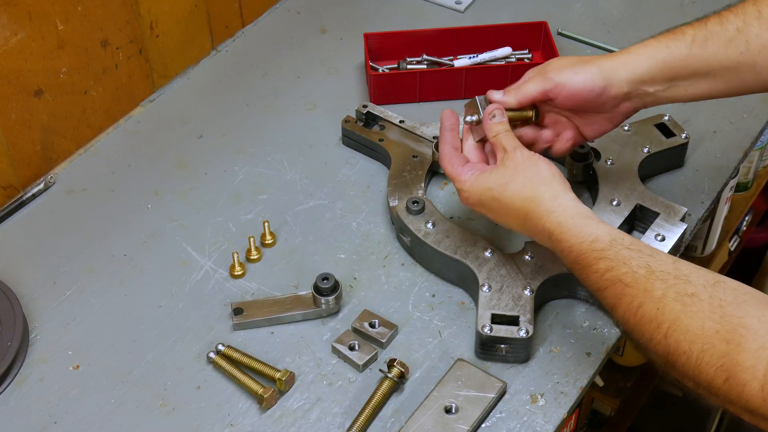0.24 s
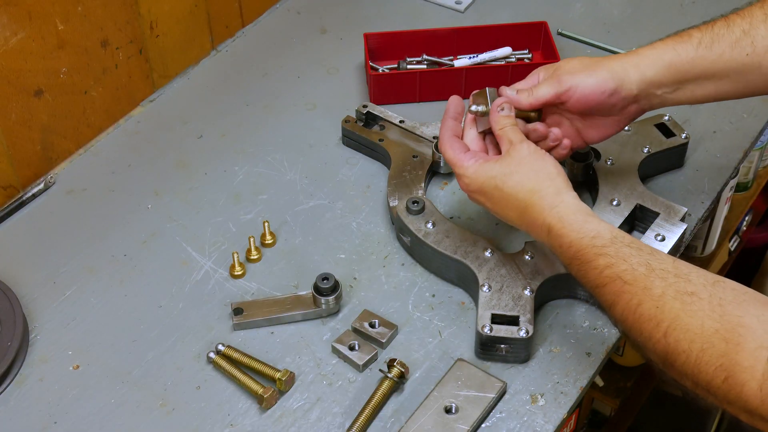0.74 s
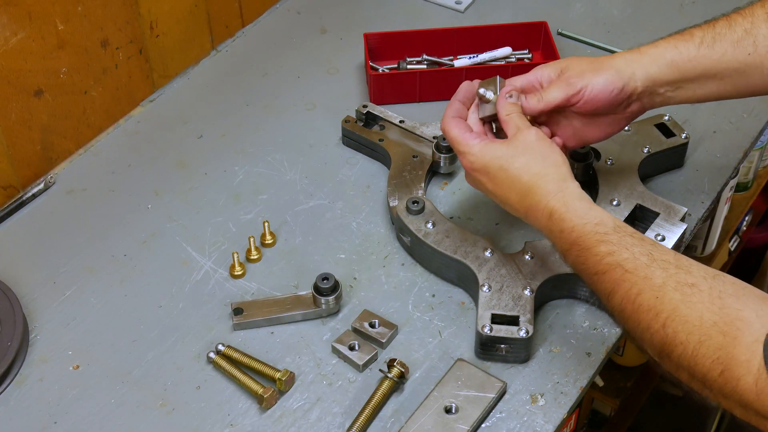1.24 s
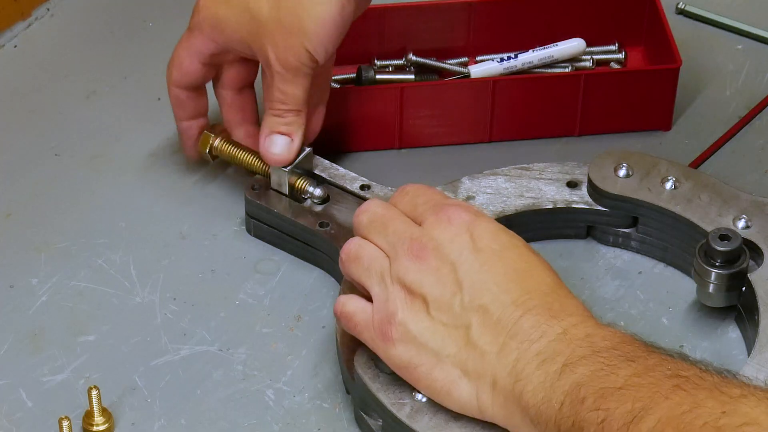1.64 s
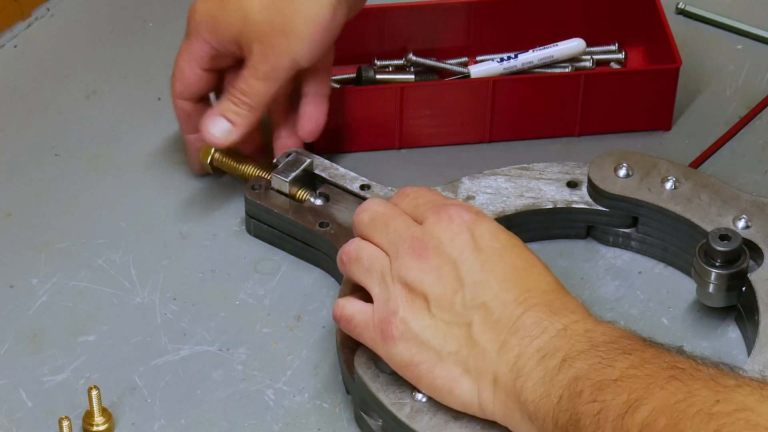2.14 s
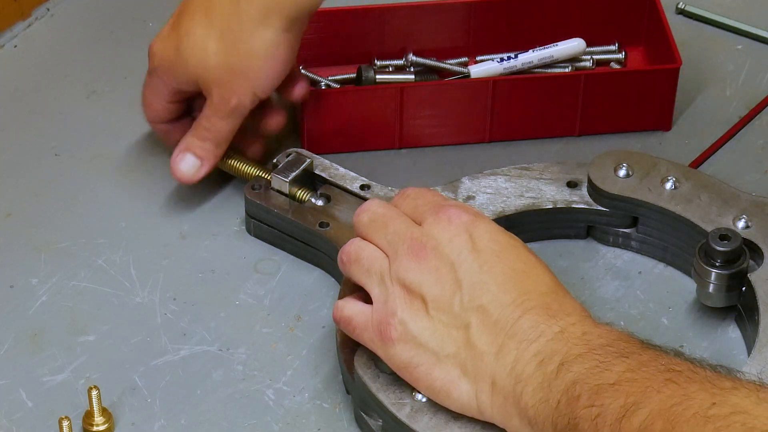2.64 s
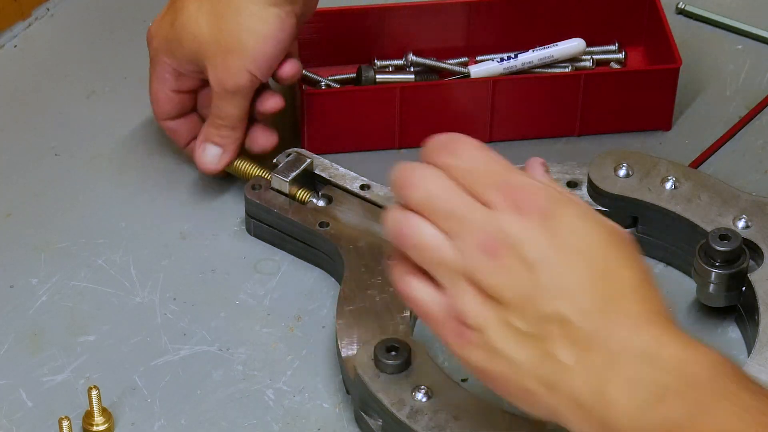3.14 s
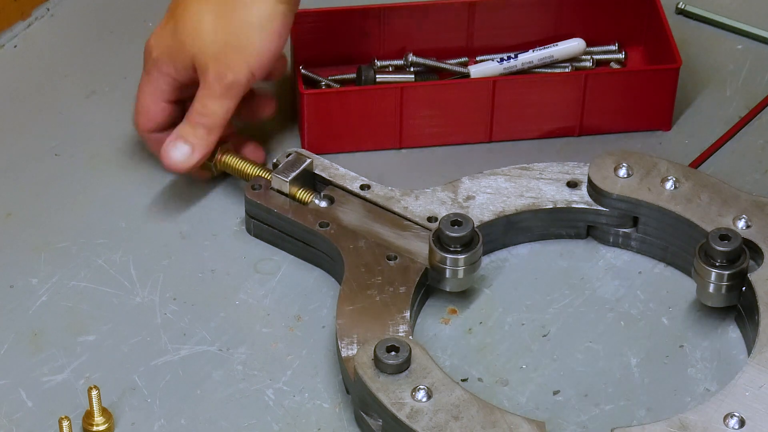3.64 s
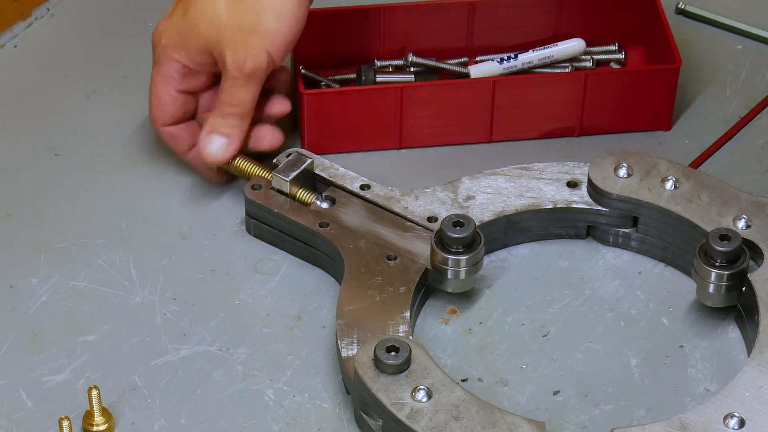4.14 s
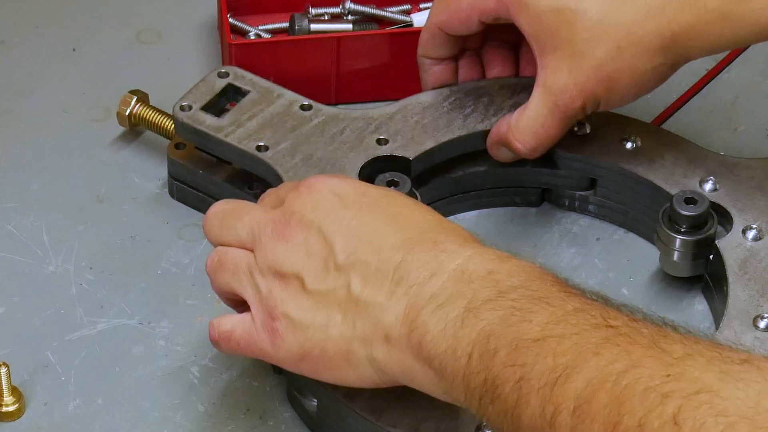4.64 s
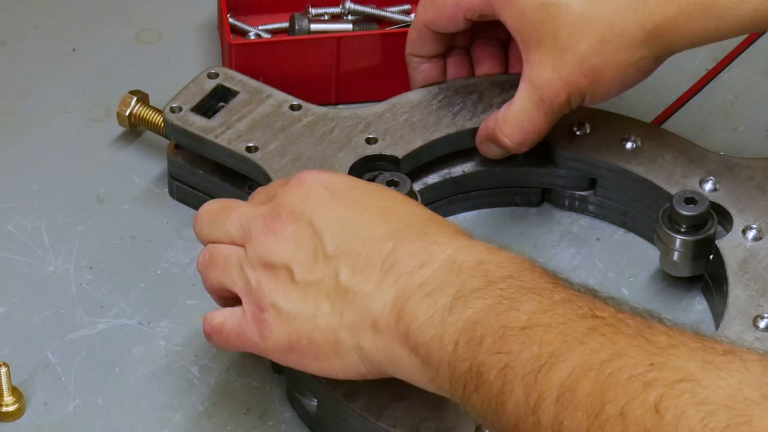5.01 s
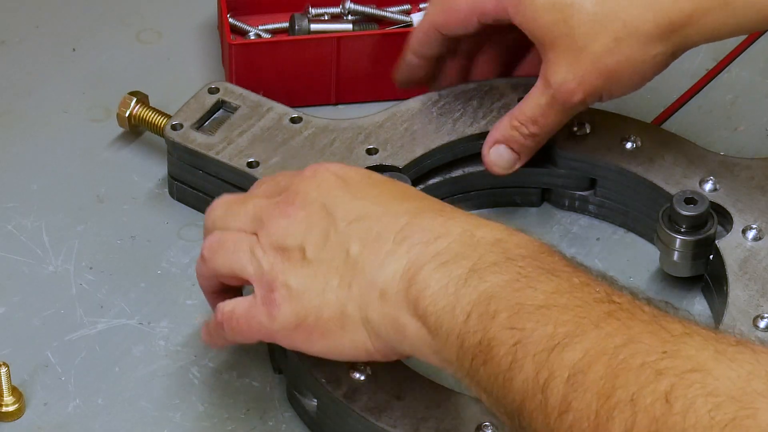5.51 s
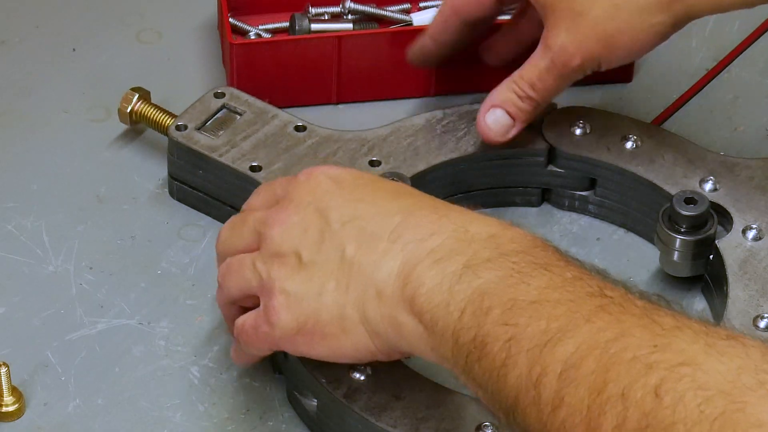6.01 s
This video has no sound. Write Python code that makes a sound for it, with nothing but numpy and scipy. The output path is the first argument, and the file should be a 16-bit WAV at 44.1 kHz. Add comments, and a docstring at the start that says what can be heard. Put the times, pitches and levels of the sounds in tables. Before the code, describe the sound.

A fan rushes steadily in a small workshop while a bolt turns into a steel nut with faint pings. The background noise jumps up, and the pair drops into a steel frame with a sharp clink, followed by light knocks and finger rubbing. The noise falls back, then a steel plate clinks and clatters into its seat, thudding softly through the workbench. The microphone is close and nearly mono.

```python
"""Faint pings over a steady fan: a bolt is turned into a steel nut, close to a nearly mono microphone.
Both drop into the slot of a steel frame and knock as fingers screw them on. A cover plate then clinks
into its seat. Each blow is a chatter of impacts that drives clear ringing modes and a damped clack,
thuds through the workbench and echoes in a small workshop. Midway the background noise steps up
abruptly for three seconds, then drops back."""
import sys
import numpy as np
from scipy import signal
from scipy.fft import rfft, irfft, next_fast_len
from scipy.io import wavfile
from scipy.ndimage import uniform_filter1d

SR = 44100
rng = np.random.default_rng(int(sys.argv[2]) if len(sys.argv) > 2 else 0)


def transcribe(u):
    """Save the signal u as a 16-bit wav file named by the first command-line argument.

    u: samples, shape (n,) or (channels, n), limited to [-1, 1]; the rate is SR.
    q: integer samples, one column per channel.
    """
    v = np.clip(np.atleast_2d(u).T, -1, 1)
    q = np.round(v * 32767).astype(np.int16)
    wavfile.write(sys.argv[1], SR, q)


N = 276507
BLOW_TIME_S = np.arange(SR // 2) / SR
NUT_ECHO_DB, SHIMMER_ECHO_DB = -6, -3  # hand and slot shade these from the walls

# Plate on frame. Each row: start in seconds, strength in dB, shimmer over strength in dB, thud in dB,
# chatter in seconds, hardness in Hz, favoured plate mode in Hz, favoured shimmer mode in Hz.
PLATE_KNOCKS = [ (4.634, -49.5, -15, -48.5, 0.0026, 5060, 3270, 9400),
                (4.642, -61, -14.5, -51.5, 0.0014, 4430, 5690, 12310),
                (4.933, -44.5, -31, -42, 0.0023, 3930, 3470, 12740),
                (4.937, -59, -10, -55, 0.0023, 4470, 4478, 9840),
                (5.036, -61, -20, -48.5, 0.0041, 3020, 3270, 9873),
                (5.231, -48.5, -17, -45, 0.0024, 4490, 4478, 8130),
                (5.262, -61, -17, -47.5, 0.0057, 3000, 2660, 12740),
                (5.37, -49, -14, -37.5, .007, 3800, 3470, 8130),
                (5.384, -45, -21, -42, 0.0034, 1500, 2660, 7090),
                (5.388, -41, -5, -41, 0.0057, 6000, 5217, 7090),
                (5.4058, -31.5, -12, -35, 0.0027, 11000, 4600, 7090),
                (5.4071, -35, -6, -32.5, 0.003, 11100, 5070, 12310),
                (5.414, -28, -15, -44, 0.005, 11000, 4955, 11580),
                (5.43, -36, -14, -43, 0.0026, 7400, 4570, 9400),
                (5.445, -44, -18, -46.5, 0.0028, 7900, 5217, 11580),
                (5.8321, -56, -8, -41, 0.0076, 7000, 5217, 11580),
                (5.8604, -31, -11, -34.5, 0.0069, 5100, 3270, 9400),
                (5.873, -33.5, -27, -34, 0.0098, 3800, 4430, 9873),
                (5.948, -33, -6, -47, 0.0028, 6700, 4515, 8050),
                (5.958, -59, -19, -42.5, 0.0044, 2000, 4478, 8130),
                (5.9824, -29.5, -3.5, -39, 0.0022, 8300, 3470, 8130)]
# Bolt and nut in the slot. Each row: start in seconds, ring in dB, nut over bolt in dB, clack over ring
# in dB, glint in dB, chatter in seconds, hardness in Hz, favoured mode in Hz, favoured glint in Hz.
BOLT_KNOCKS = [ (1.759, -44, 10, -1, -77, .005, 5000, 5870, 11380),
               (1.778, -21.5, 25, 1.5, -49, 0.0008, 11100, 5770, 14880),
               (1.78, -22.5, 27, -3.5, -43, .001, 14000, 5770, 11380),
               (1.787, -45, 6, 9, -52, 0.0023, 14000, 5240, 11380),
               (2.539, -48, -3, 3.5, -65, 0.019, 7000, 5740, 11380),
               (2.875, -52.5, -10, -4, -76, 0.016, 6000, 5240, 14880),
               (3.221, -35, 24, -3.5, -71, 0.0015, 4500, 5750, 14880),
               (3.272, -42.5, -18, -1, -72, 0.0021, 6000, 3060, 11380),
               (3.357, -57, -9, 3, -88, .0012, 14000, 5240, 11380),
               (3.6072, -37.5, -33, -5, -77, 0.0021, 12200, 3070, 14880),
               (3.677, -57, -13, 8.5, -85, .0034, 10000, 5240, 11380),
               (3.817, -43.5, -8, -6, -84, 0.006, 5000, 5240, 11380),
               (3.866, -44.5, -7, 2.5, -65, 0.0084, 11000, 5770, 11380),
               (3.925, -47.5, -24, 1.5, -83, 0.003, 7000, 5240, 11380),
               (4.129, -41.5, 3, -8, -78, 0.0026, 6000, 5940, 11380),
               (4.148, -45.5, -3, 0.5, -67, 0.014, 4500, 5240, 11380),
               (4.212, -46.5, 11, 6, -73, .0077, 6000, 5700, 11380),
               (4.242, -38.5, 12, -4, -81, 0.011, 3500, 5600, 14880),
               (4.339, -57, -7, -1, -85, .0012, 14000, 5240, 11380),
               (4.477, -43, -10, -3, -76, 0.0048, 5070, 5240, 11380),
               (4.493, -49, -11, -3, -82, 0.0037, 4930, 4750, 14880)]
# Nut on thread. Each row: start in seconds, level in dB, scrape time in seconds.
THREAD_TWISTS = [(.125, -67, .043), (.455, -65, 0.05), (0.773, -63, 0.015), (1.035, -63, .054),
                 (1.27, -63, 0.0089)]
# Fingers on thread and frame. Each row: centre in seconds, length in seconds, peak level in dB.
FINGER_RUBS = [(2.897, 0.22, -45.5), (3.548, 0.16, -42.5), (3.862, 0.1, -41), (4.197, 0.16, -41.5),
               (5.826, 0.072, -49.5)]
# Hand on the work. Each row: start in seconds, level in dB, contact time in seconds.
HAND_BUMPS = [(3.253, -35.5, 0.0097), (5.246, -41.5, 0.0048)]

# Clear modes of each part. Each row: frequency in Hz, relative level in dB, T60 in seconds.
PLATE_MODES = [(2660, -9, .08), (2915, -10, .08), (3270, -2.5, .1), (3470, -4, .04), (4064, -9, .09),
               (4478, -3, .17), (4548, -5.5, .15), (4592, -10, .1), (4790, -11, .07), (4955, -6, .12),
               (5070, -8, .11), (5217, -6, .12), (5450, -10, .1), (5690, -7, .11), (5980, -12, .09),
               (6367, -8, .13)]
SHIMMER_MODES = [(7090, -6, .16), (8005, -10, .18), (8120, -1, .035), (8155, -10, .2), (8600, -6, .025),
                 (9400, -5, .06), (9873, -4, .12), (10640, -11, .09), (11580, -2, .07), (12310, -7, .2),
                 (12740, -6, .16), (14270, -6, .15), (15280, -10, .17)]
NUT_MODES = [(5670, -5, .03), (5770, 0, .036), (5870, -5, .034), (6440, -17, .025), (8260, -24, .05)]
BOLT_MODES = [(3000, -2, .035), (4150, -9, .012), (4750, -7, .01), (5240, -4, .018), (9700, -27, .008)]
GLINT_MODES = [(11340, -2, .11), (11420, 0, .13), (14880, 0, .05)]
FRAME_MODES = [(400, 0, .1), (555, -9, .09), (805, -3, .08), (940, -3, .1), (1085, 0, .12), (1285, -1, .15),
               (1550, -5, .12), (2084, -12, .12), (2400, -11, .1)]
BENCH_MODES = [(74, -6, .12), (100, -1, .14), (135, 0, .11)]

# Spectra of the damped bodies, skin friction and fan rush. Each row: frequency in Hz, relative gain in dB.
PLATE_SPECTRUM = [(100, -22), (600, -6), (1800, -9), (3000, -2), (4800, -2), (5900, -0.5), (7400, -13),
                  (9500, -14), (12500, -22), (13500, -14), (15500, -58)]
FRAME_SPECTRUM = [(100, -30), (500, -13), (850, 3.5), (1100, 5), (1700, -1.5), (3000, -5), (5200, -4.5),
                  (6300, -3.5), (7300, -19), (10000, -20.5), (15500, -22.5)]
BENCH_SPECTRUM = [(30, -42.5), (70, -23), (105, -13), (160, 1), (300, -0.5), (420, -1), (560, -5.5),
                  (900, -9), (1300, -12.5), (2200, -35), (6000, -61)]
FINGER_SPECTRUM = [(40, -20.5), (130, 5), (250, 5), (500, -0.5), (900, -14), (1700, -4), (3000, -14.5),
                   (6000, -20.5), (15000, -86)]
FAN_SPECTRUM = [(15, -36.5), (25, -1), (119, -15.5), (178, -7), (209, -11), (274, -7), (445, -6), (552, -3),
                (703, -5.5), (871, -3.5), (1300, -3.5), (3720, -15.5), (8810, -38.5), (11200, -40),
                (15500, -53)]

# Workshop echo. Each row: frequency in Hz, band gain in dB, T60 in seconds.
ROOM_BANDS = [(152, -11, .25), (491, -18, 0.9), (1311, -3, 0.18), (2890, -7.5, 0.28), (6000, -12, 0.3),
              (8500, -5.5, 0.2), (13940, -4.5, .15)]
# Fan resonances. Each row: frequency in Hz, width in Hz, base level in dB.
FAN_PEAKS = [(60, 3.06, -79.5), (95.4, 1.1, -74.5), (276.8, 13.24, -69), (563.5, 10, -69),
             (1063, 40.3, -100), (1346, 28, -72.5)]
# Share of the rush that differs between left and right. Each row: frequency in Hz, gain in dB.
FAN_SIDE_SPECTRUM = [(40, -30), (150, -27.5), (1000, -42), (3000, -25.5), (5500, -17), (9000, -10.5),
                     (15000, -8)]


def cover_plate(choke_db_per_db=0.15, full_jolt_hz=8430, jolt_db_per_octave=17.5):
    """The plate clinks, shimmers, rocks the bench and jolts the nut. Returns direct sound, room feed."""
    body, shimmer, nut = np.zeros((3, N))
    for start_s, db, shimmer_db, thud_db, chatter_s, hardness_hz, favoured_hz, shimmer_hz in PLATE_KNOCKS:
        # only hard blows jolt the nut fully
        nut_db = db + 1.5 + jolt_db_per_octave * min(np.log2(hardness_hz / full_jolt_hz), 0)
        # strong blows press the plate down and choke its ring
        ring_db = db - 1.5 - choke_db_per_db * (db + 45)
        force = contact(chatter_s)
        push = soften(force, hardness_hz)
        landing = settling(force, lag_s=0.011, db=-11.5)
        thud = bench_thud(landing, thud_db)
        boom = ring(soften(landing, hardness_hz=250), BENCH_MODES, thud_db - 12)
        clack = damped_burst(landing, PLATE_SPECTRUM, db - 1.5, hardness_hz, t60_s=0.04)
        clink = ring(push, struck_at(PLATE_MODES, favoured_hz), ring_db)
        add(body, start_s, thud + boom + clack + clink)
        shimmer_modes = dulled(struck_at(SHIMMER_MODES, shimmer_hz), hardness_hz)
        add(shimmer, start_s, ring(push, shimmer_modes, db + shimmer_db, pressed_gain=0.65))
        cushioned_modes = dulled(NUT_MODES, hardness_hz=4000)  # the frame cushions the jolt
        add(nut, start_s, ring(push, cushioned_modes, nut_db))
    room_feed = body + undb(SHIMMER_ECHO_DB) * shimmer + undb(NUT_ECHO_DB) * nut
    return np.array([body + shimmer + nut, room_feed])


def bolt_in_slot():
    """Hand-held bolt and nut ring briefly; the heavy frame clacks. Returns direct sound, room feed."""
    body, nut = np.zeros((2, N))
    for (start_s, ring_db, nut_over_bolt_db, clack_over_ring_db, glint_db,
         chatter_s, hardness_hz, favoured_hz, glint_hz) in BOLT_KNOCKS:
        bolt_db = ring_db - 10 * np.log10(1 + undb(nut_over_bolt_db) ** 2)  # the two share the energy
        clack_db = ring_db + clack_over_ring_db
        force = contact(chatter_s)
        push = soften(force, hardness_hz)
        landing = settling(force, lag_s=0.009, db=-14)
        thud = bench_thud(landing, clack_db - 1)
        clack = damped_burst(landing, FRAME_SPECTRUM, clack_db, hardness_hz, t60_s=0.057)
        frame_ring = ring(push, FRAME_MODES, clack_db - 5)
        bolt_modes = dulled(struck_at(BOLT_MODES, favoured_hz, boost_db=5.5), hardness_hz)
        add(body, start_s, thud + clack + frame_ring + ring(push, bolt_modes, bolt_db))
        ping = nut_ping(force, favoured_hz, hardness_hz, bolt_db + nut_over_bolt_db)
        add(nut, start_s, ping + glint(force, glint_hz, glint_db))
    return np.array([body + nut, body + undb(NUT_ECHO_DB) * nut])


def thread_twists():
    """The thread scrapes: the nut pings, the bolt glints. Returns direct sound, room feed."""
    nut = np.zeros(N)
    for start_s, db, scrape_s in THREAD_TWISTS:
        force = contact(scrape_s)
        ping = nut_ping(force, favoured_hz=5870, hardness_hz=7000, db=db)
        add(nut, start_s, ping + glint(force, favoured_hz=14880, db=db - 26))
    return np.array([nut, undb(NUT_ECHO_DB) * nut])


def nut_ping(force, favoured_hz, hardness_hz, db):
    """The nut's modes, weighted by the place and hardness of the contact."""
    modes = dulled(struck_at(NUT_MODES, favoured_hz), hardness_hz)
    return ring(soften(force, hardness_hz), modes, db)


def glint(force, favoured_hz, db):
    """The bolt's highest modes: a thin, bright ring."""
    return ring(force, struck_at(GLINT_MODES, favoured_hz), db, pressed_gain=0.48)


def bench_thud(force, db, hardness_hz=15000):
    """The bench's low, quickly damped modes."""
    return damped_burst(force, BENCH_SPECTRUM, db, hardness_hz, t60_s=0.044)


def finger_rubs(slips_per_s=4000):
    """Skin on steel: dense, uneven slips that swell and fade with each stroke."""
    slips = rng.standard_normal(N) * (rng.random(N) < slips_per_s / SR)
    pressure = np.zeros(N)
    for centre_s, length_s, db in FINGER_RUBS:
        add(pressure, centre_s - length_s / 2, undb(db) * np.hanning(int(length_s * SR)))
    return pressure * level(colour(slips, FINGER_SPECTRUM), 0)


def hand_bumps():
    """A soft hand bumps the work; only the bench answers."""
    thuds = np.zeros(N)
    for start_s, db, contact_s in HAND_BUMPS:
        add(thuds, start_s, bench_thud(contact(contact_s), db, hardness_hz=450))
    return thuds


def contact(chatter_s, bounce_gain=0.49, bounces_per_s=2200):
    """One impact, then dwindling random ones as the faces chatter."""
    strengths = bounce_gain * rng.standard_normal(len(BLOW_TIME_S))
    touching = rng.random(len(BLOW_TIME_S)) < bounces_per_s / SR
    force = strengths * touching * np.exp(-(BLOW_TIME_S / chatter_s) ** 2 / 2)
    force[0] = 1
    return force


def settling(force, lag_s, db):
    """A part lands on an edge, then falls flat."""
    flat = np.interp(BLOW_TIME_S - lag_s, BLOW_TIME_S, contact(chatter_s=0.0051), left=0)
    return force + undb(db) * flat * np.linalg.norm(force) / np.linalg.norm(flat)


def soften(x, hardness_hz):
    """A softer contact pushes for longer: a low-pass at its hardness."""
    return signal.sosfilt(signal.butter(2, min(hardness_hz, 0.45 * SR), fs=SR, output="sos"), x)


def struck_at(modes, favoured_hz, boost_db=9, width_hz=90):
    """The spot that is hit boosts the modes near one pitch."""
    return [(hz, db + boost_db * np.exp(-((hz - favoured_hz) / width_hz) ** 2), t60_s)
            for hz, db, t60_s in modes]


def dulled(modes, hardness_hz):
    """Modes above the contact's hardness are barely driven."""
    return [(hz, db - 10 * np.log10(1 + (hz / hardness_hz) ** 4), t60_s) for hz, db, t60_s in modes]


def ring(force, modes, db, pressed_gain=1.34, pressed_t60_s=0.031, scatter_db=1.5):
    """Clear modes: a fast loss while the faces press together, then a free decay."""
    draws = rng.standard_normal((len(modes), 3))
    ringing = 0
    for (hz, mode_db, t60_s), (share, shift, polarity) in zip(modes, draws):
        hz = hz * (1 + 0.0006 * shift)  # the grip detunes
        partial = mode(force, hz, t60_s) + pressed_gain * mode(force, hz, min(pressed_t60_s, t60_s))
        # the place of the blow sets share and sign
        ringing = ringing + np.sign(polarity) * blow_level(partial, mode_db + scatter_db * share)
    return blow_level(ringing, db)


def damped_burst(force, spectrum, db, hardness_hz, t60_s, split_hz=7500, treble_t60_s=0.03):
    """Many overlapping modes: each impact leaves noise in the body's colour; treble dies first."""
    burst = 0
    for band, band_t60_s in ("lowpass", t60_s), ("highpass", treble_t60_s):
        energy = signal.fftconvolve(force ** 2, fade(band_t60_s) ** 2)[:len(force)]
        noise = np.sqrt(abs(energy)) * rng.standard_normal(len(force))
        burst = burst + signal.sosfilt(signal.butter(6, split_hz, band, fs=SR, output="sos"), noise)
    return blow_level(soften(colour(burst, spectrum), hardness_hz), db)


def workshop_echo(x, build_s=0.0048):
    """Diffuse echo: a quick build-up, then a separate decay in each band."""
    size = len(BLOW_TIME_S)
    hz, db, t60_s = np.transpose(ROOM_BANDS)
    noise_spectrum = rfft(rng.standard_normal(size))
    log_hz = np.log(np.maximum(np.fft.rfftfreq(size, 1 / SR), 1))
    response = 0
    for band, band_db, band_t60_s in zip(np.eye(len(hz)), db, t60_s):
        envelope = fade(band_t60_s) * (1 - np.exp(-(BLOW_TIME_S / build_s) ** 2))
        band_noise = irfft(noise_spectrum * np.interp(log_hz, np.log(hz), band), size)
        response = response + undb(band_db) * envelope / np.linalg.norm(envelope) * band_noise
    return signal.fftconvolve(x, response)[:N]


def fan(base_db=-54.4):
    """Steady rush of air with a few resonances."""
    air = level(colour(rng.standard_normal(N), FAN_SPECTRUM), base_db)
    for hz, width_hz, db in FAN_PEAKS:
        t60_s = np.log(1000) / (np.pi * width_hz)
        air = air + level(mode(rng.standard_normal(N), hz, t60_s), db)
    return air


def background_step(noise, step_db=11.5, from_s=1.511, to_s=4.514):
    """The background noise steps up abruptly, then drops back."""
    time_s = np.arange(N) / SR
    raised = 1.0 * ((time_s > from_s) & (time_s < to_s))
    return noise * undb(step_db * uniform_filter1d(raised, size=200))


def mode(x, hz, t60_s):
    """One decaying resonance that radiates little below its pitch."""
    pole = np.exp((2j * np.pi * hz - np.log(1000) / t60_s) / SR)
    return signal.lfilter([1, 0, -1], [1, -2 * pole.real, abs(pole) ** 2], x)


def colour(x, spectrum, size=4096):
    """Minimum-phase filter through (Hz, dB) points."""
    hz, db = np.transpose(spectrum)
    grid_hz = np.maximum(np.fft.rfftfreq(size, 1 / SR), 1)
    cepstrum = irfft(np.log(undb(np.interp(np.log(grid_hz), np.log(hz), db))))
    cepstrum[1:size // 2] *= 2
    cepstrum[size // 2 + 1:] = 0
    return signal.fftconvolve(x, irfft(np.exp(rfft(cepstrum))))[:len(x)]


def fade(t60_s):
    """Exponential decay."""
    return np.exp(-np.log(1000) * BLOW_TIME_S / t60_s)


def undb(db):
    """Decibels to gain."""
    return 10 ** (np.asarray(db) / 20)


def level(x, db):
    """Set the rms of a steady sound."""
    return x * undb(db) / np.std(x)


def blow_level(x, db):
    """Set a blow's energy, as an rms over 10 ms."""
    return x * undb(db) / np.sqrt(np.sum(x ** 2) / (SR / 100))


def add(track, start_s, x):
    """Mix a sound in at a time."""
    start = int(start_s * SR)
    track[start:start + len(x)] += x[:N - start]


def scene(quadrature_db=-47, capsule_lag_s=2.4e-6):
    """All sources centred; two close capsules hear the steel with a slight phase shift and lag."""
    air, unrelated_air = background_step(fan()), background_step(fan())
    direct, room_feed = thread_twists() + bolt_in_slot() + cover_plate() + finger_rubs() + hand_bumps()
    steel = direct + workshop_echo(room_feed)
    phase_shift = undb(quadrature_db) * signal.hilbert(steel, next_fast_len(N))[:N].imag
    lag = capsule_lag_s * SR / 2 * np.gradient(steel)
    side = phase_shift - lag + colour(unrelated_air, FAN_SIDE_SPECTRUM)
    return np.array([steel + air + side, steel + air - side])


def record(dry, cutoff_hz=15800):
    """The microphone chain cuts the top steeply."""
    return signal.sosfilt(signal.ellip(10, 0.1, 80, cutoff_hz, fs=SR, output="sos"), dry)


dry = scene()
out = record(dry)
transcribe(out)
```